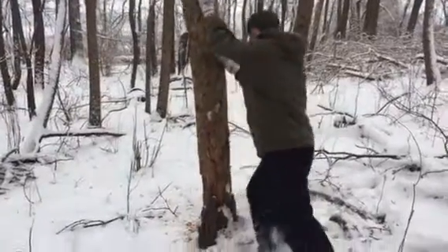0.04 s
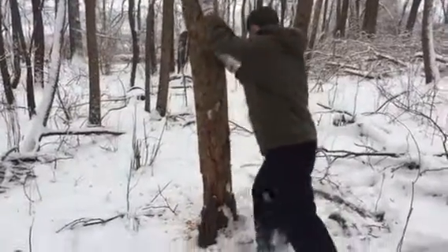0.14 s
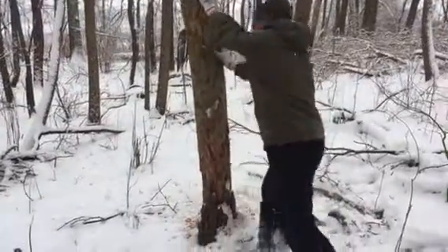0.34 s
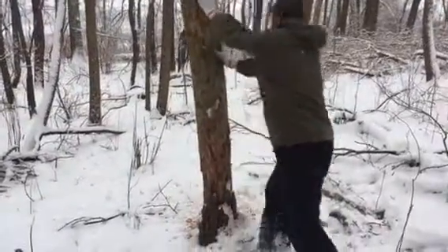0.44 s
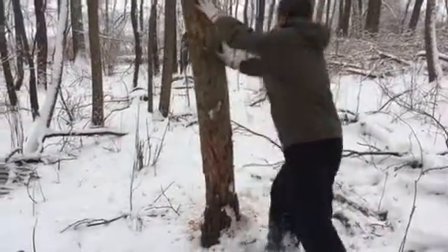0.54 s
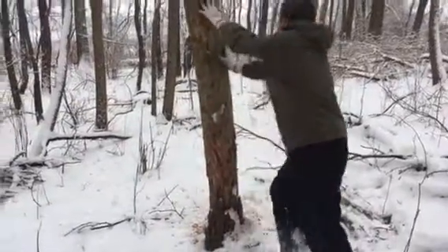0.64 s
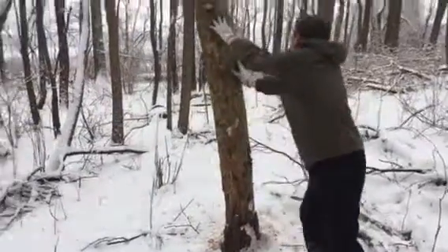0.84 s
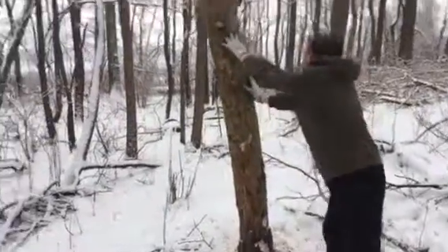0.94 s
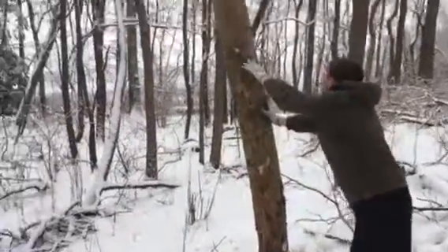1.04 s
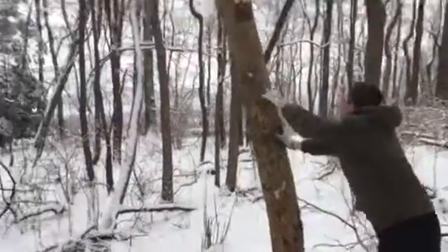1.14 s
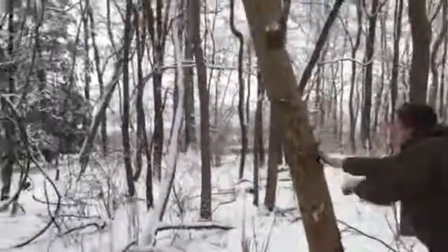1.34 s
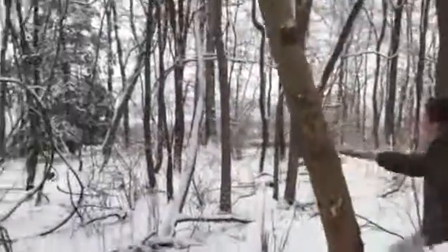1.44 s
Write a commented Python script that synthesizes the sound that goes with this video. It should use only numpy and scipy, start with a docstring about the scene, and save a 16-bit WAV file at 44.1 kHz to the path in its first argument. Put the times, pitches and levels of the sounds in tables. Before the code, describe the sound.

Wood cracks and splinters in sharp bursts as a dead tree is pushed over.

```python
"""Dead tree pushed over in the snow

A snowy forest in still air, heard in mono from near the trunk. The wood splits in bursts of sharp
cracks; the biggest jolt the trunk, which thumps. Small fibres crackle and sizzle as it leans, with
a rustle of clothes and soft thuds in the snow. The breaking wood echoes off the trees close by,
then washes back from the far ones."""
import sys
import numpy as np
from scipy import signal
from scipy.fft import rfft, irfft
from scipy.io import wavfile

SR = 44100
rng = np.random.default_rng(int(sys.argv[2]) if len(sys.argv) > 2 else 0)


def int16_out(signal):
    """Quantize to a 16-bit WAV file."""
    q = np.round(np.clip(np.atleast_2d(signal).T, -1, 1) * 32767)
    wavfile.write(sys.argv[1], SR, q.astype(np.int16))


N = 66150
TIME = np.arange(N) / SR

# still forest air: freq_hz, level_db
AIR_SPECTRUM = [(25, 2), (60, 7.5), (200, 1), (400, -10.5), (650, 0.5), (1500, -9), (4000, -25),
                (16000, -23)]
# clothes and boots shifting: time_s, level_db
RUSTLE_LEVELS = [(0, -64), (.88, -62), (.95, -45), (1.03, -52), (1.14, -44.5), (1.19, -55.5), (1.5, -53)]
# their dull tone: freq_hz, level_db
RUSTLE_SPECTRUM = [(25, -23), (60, -7), (130, 0.5), (300, 4), (450, -13), (700, -15), (2000, -34)]
# spurts of small fibres giving way: time_s, level_db
FIBRE_LEVELS = [(0, -58.5), (.219, -55), (.223, -17), (.256, -25.5), (.27, -32), (.34, -48), (.59, -50),
                (.665, -53.5), (.705, -22), (.72, -35.5), (.77, -50), (.89, -72), (.985, -63),
                (1.012, -39.5), (1.09, -44.5), (1.19, -48.5), (1.222, -46), (1.27, -45), (1.296, -35.5),
                (1.32, -48.5), (1.385, -47.5), (1.399, -35.5), (1.42, -52.5), (1.465, -42.5), (1.5, -47.5)]
# their woody tone: freq_hz, level_db
FIBRE_SPECTRUM = [(100, 6), (400, -2.5), (700, 4.5), (1500, 3.5), (3000, -1), (6000, -3), (10000, -9),
                  (16000, -16)]
# the finest fibres tearing: time_s, level_db
SIZZLE_LEVELS = [(0, -63.5), (.6, -59), (.8, -53.5), (.89, -56), (.99, -51.5), (1.012, -31), (1.06, -43.5),
                 (1.14, -44), (1.18, -46), (1.26, -43.5), (1.5, -55)]
# their bright tone: freq_hz, level_db
SIZZLE_SPECTRUM = [(1500, -19), (4000, -3.5), (9000, 2), (16000, -2)]
# dull knocks in the snow: start_s, level_db, pitch_hz, rise_s
SNOW_THUDS = [(0.09, -37.5, 680, 0.0024), (.092, -44, 208, 0.012), (.101, -40.5, 604, 0.0034),
              (0.223, -35, 41.8, 0.019), (0.694, -31.5, 120, 0.0061), (0.9051, -33.5, 156, 0.0049),
              (.997, -36.5, 116, 0.0069), (1.124, -37, 229, 0.0032), (1.147, -44.5, 105, 0.012),
              (1.221, -45, 230, 0.0034), (1.294, -49.5, 135, 0.021)]
# the wood splitting: start_s, ring_hz, ring_db, crack_hz, crack_db, snap_db, bark_db
WOOD_SPLITS = [(0.1986, 1500, -41, 3690, -48, -46, -53), (0.2206, 1460, -10.5, 2450, -14.5, -13.5, -21.5),
               (0.2268, 1130, -12.5, 2380, -13.5, -25, -16), (0.2299, 1110, -10.5, 5600, -17, -40, -18),
               (0.2423, 1470, -12, 2800, -17, -19, -32), (0.2497, 1500, -11.5, 2640, -13, -17, -29),
               (0.2764, 1220, -15.5, 2980, -14, -15, -21.5), (0.2928, 1500, -48, 2210, -33, -53, -50),
               (0.3691, 1940, -34, 2320, -39, -60, -52), (0.3834, 1440, -31, 5200, -37.5, -29, -46),
               (0.4476, 1360, -25.5, 3370, -23.5, -22, -35), (0.5864, 1500, -59, 4520, -47, -40, -63),
               (0.5957, 1430, -48, 3140, -34.5, -35, -59), (0.604, 1250, -18.5, 3025, -17, -9.5, -22.5),
               (0.618, 972, -35, 2410, -50, -29, -33), (0.6329, 1400, -15, 2830, -18, -21, -30),
               (0.6488, 1530, -31, 2850, -26, -30, -46), (0.6502, 1800, -23, 4330, -21, -25, -26.5),
               (0.673, 1470, -44, 3040, -38, -35, -52), (0.678, 1400, -32, 3000, -40, -40, -50),
               (0.6895, 1290, -16, 3240, -13.5, -23, -27.5), (0.6925, 1480, -18, 2730, -9.5, -17.5, -28),
               (0.6986, 1210, -17, 2400, -15.5, -18, -25), (0.7312, 1300, -35, 3700, -33, -35, -50),
               (0.7853, 1900, -58, 2230, -37.5, -34, -58), (0.8281, 1266, -34, 3420, -31.5, -31.5, -40),
               (0.8482, 1500, -62, 3330, -47, -40, -64.5), (0.9153, 1300, -19.5, 5460, -20.5, -26.5, -35.5),
               (0.9333, 1420, -59, 5920, -50, -35, -60), (0.9463, 1226, -27.5, 3600, -23.5, -21, -35),
               (0.9898, 1370, -23, 2860, -25, -19, -33), (0.9924, 1320, -18, 3110, -13, -16.5, -27.5),
               (1.0057, 1830, -25, 2400, -24.5, -23, -35), (1.054, 950, -49, 3500, -33, -29.5, -50),
               (1.0718, 1430, -33, 5870, -41, -26, -53), (1.0797, 933, -15.5, 6160, -25, -15.5, -19.5),
               (1.1028, 910, -41, 3490, -38, -34, -44), (1.1115, 1300, -48, 2650, -37, -36, -48),
               (1.132, 1380, -42, 3480, -34, -31, -40), (1.1499, 1250, -33.5, 3900, -36, -29.5, -42),
               (1.1976, 1580, -31.5, 2800, -25, -28.5, -41), (1.2176, 1470, -45, 5600, -45, -35, -52),
               (1.2211, 1570, -33, 5680, -35, -28, -40), (1.2254, 1500, -28.5, 3080, -28, -31, -45),
               (1.2345, 1400, -45, 3440, -44, -38, -52), (1.2445, 1420, -39, 3130, -31, -32, -41),
               (1.2565, 960, -37, 5850, -29, -27, -34.5), (1.2792, 1450, -36, 2960, -31, -35, -46),
               (1.2938, 1180, -27.5, 3660, -22, -16, -26), (1.3001, 1110, -32, 4300, -25, -38, -34),
               (1.3272, 1390, -36.5, 3500, -36, -39, -45), (1.3387, 1440, -36, 3400, -34, -42, -41.5),
               (1.3556, 1420, -43, 3500, -43, -35.5, -58), (1.398, 1010, -49, 4500, -37, -30, -42),
               (1.4325, 1290, -41, 2820, -34.5, -32, -51), (1.4595, 1400, -44, 3000, -33, -32.5, -51),
               (1.4623, 1450, -32, 2730, -29.5, -33.5, -39), (1.4713, 950, -45, 3380, -30.5, -36, -40)]
# jolts to the trunk: start_s, level_db, deep_mode_gain_db
TRUNK_JOLTS = [(0.2237, -18, -30), (0.2299, -11, -4.5), (0.2506, -21, 3), (0.291, -27, 9), (0.449, -40, -4),
               (0.606, -35.5, 1.5), (.6948, -22, -4.5), (0.701, -24, 3), (0.996, -33.5, -11)]
# modes of the trunk: pitch_hz, level_db, t60_s
TRUNK_MODES = [(61, -23, .15), (92.7, -12, 0.16), (120, -8.5, 0.1), (148.4, -13.5, 0.14), (186, -3, 0.072),
               (240, -5, 0.091), (282.6, -3.5, 0.1), (322.4, 1, 0.059), (336, -13, 0.055),
               (530, -9.5, 0.14), (573, -4.5, 0.039)]
# echoes among the trees: freq_hz, near_db, near_t60_s, far_db, far_t60_s
TREE_ECHOES = [(39.6, -31, 0.25, -9, 0.98), (117, -9, 0.26, -24.5, 0.79), (336, -11.5, 0.17, -26, 2.7),
               (630, -9, 0.31, -18, 2.74), (1300, -18, 0.28, -27, 1.5), (2010, -13.5, 0.27, -21.5, 1.7),
               (3180, -24.5, 0.082, -23, 0.94), (8000, -22.5, 0.14, -23.5, 0.28),
               (15900, -20, 0.21, -42, 0.26)]

SPLIT_RISE_S = 0.00035


def from_db(db):
    return 10 ** (np.asarray(db) / 20)


def unit_rms(x):
    return x / np.sqrt(np.mean(x ** 2) + 1e-20)


def unit_energy(x):
    return x / np.sqrt(np.sum(x ** 2) + 1e-20)


def level(curve):
    """Gain over time from points of time_s, level_db."""
    return from_db(np.interp(TIME, *np.transpose(curve)))


def band(x, low_hz, high_hz, order=2):
    sos = signal.butter(order, [low_hz, high_hz], "band", fs=SR, output="sos")
    return signal.sosfilt(sos, x + 1e-18)


def coloured(x, spectrum):
    """Shapes x by points of freq_hz, level_db; the result has rms 1."""
    hz, db = np.transpose(spectrum)
    bins_hz = np.maximum(np.fft.rfftfreq(N, 1 / SR), 1)
    gain = from_db(np.interp(np.log(bins_hz), np.log(hz), db)) * (bins_hz > 20)
    return unit_rms(irfft(rfft(x) * gain, N))


def add(out, start_s, x):
    i = int(start_s * SR)
    out[i:i + len(x)] += x[:N - i]


def air(level_db=-54.5):
    """The forest's faint, steady hush around the microphone."""
    return from_db(level_db) * coloured(rng.standard_normal(N), AIR_SPECTRUM)


def rustle():
    """Clothes and boots shift in the snow with a dull, swelling noise."""
    return level(RUSTLE_LEVELS) * coloured(rng.standard_normal(N), RUSTLE_SPECTRUM)


def crackle(per_s, spread_db, clumping_db, clump_s=0.0046, decay_s=0.00015, kinds=12, size=200):
    """Countless small snaps of uneven size come in clumps, each with one of several short rings."""
    wander = np.clip(rng.standard_normal(N), -2, 2)
    clump_db = clumping_db * np.interp(TIME / clump_s, np.arange(N), wander)
    clicks = (rng.random(N) < per_s / SR) * rng.choice([-1, 1], N)
    clicks = clicks * from_db(clump_db + spread_db * np.minimum(rng.exponential(1, N), 3.5))
    kind = rng.integers(0, kinds, N)
    rings = rng.standard_normal((kinds, size)) * np.exp(-TIME[:size] / decay_s)
    return sum(signal.fftconvolve(clicks * (kind == k), ring)[:N] for k, ring in enumerate(rings))


def fibres():
    """Small fibres give way one by one as the trunk leans, with a woody crackle."""
    snaps = crackle(per_s=3700, spread_db=3, clumping_db=4)
    return level(FIBRE_LEVELS) * coloured(snaps, FIBRE_SPECTRUM)


def sizzle():
    """The finest fibres tear so densely that their snaps merge into a bright sizzle."""
    snaps = crackle(per_s=12000, spread_db=7.5, clumping_db=3.5)
    return level(SIZZLE_LEVELS) * coloured(snaps, SIZZLE_SPECTRUM)


def thuds(grit_gain=0.52):
    """Roots, wood and boots knock in the snow, heavily damped: a few gritty cycles swell and fade."""
    out, t = np.zeros(N), TIME[:SR // 8]
    for start_s, db, hz, rise_s in SNOW_THUDS:
        grit = unit_rms(band(rng.standard_normal(len(t)), hz / 1.5, hz * 1.5))
        swell = (t / rise_s * np.exp(1 - t / rise_s)) ** 2
        add(out, start_s, from_db(db) * swell * (np.sin(2 * np.pi * hz * t) + grit_gain * grit))
    return out


def resonance(x, hz, width_hz):
    r = np.exp(-np.pi * width_hz / SR)
    return signal.lfilter([1, 0, -1], [1, -2 * r * np.cos(2 * np.pi * hz / SR), r * r], x)


def tear(t, decay_s, break_gain=5.04, break_s=0.0003, scatter_db=-27, scatter_s=0.0051):
    """One clean break in a brief rush of tiny ruptures, scattering weakly off bark and ground."""
    scatter = from_db(scatter_db) * np.exp(-t / scatter_s)
    envelope = (1 - np.exp(-t / SPLIT_RISE_S)) * (np.exp(-t / decay_s) + scatter)
    ruptures = envelope * rng.choice([-1, 1], len(t))
    ruptures[int(break_s * SR)] += break_gain
    return ruptures


def splits(bark_hz=680, bark_decay_s=0.0027):
    """Each split is the freed splinter's short ring, a pitched crack, a bright snap and a bark knock."""
    out, t = np.zeros(N), TIME[:2000]
    bark = np.sin(2 * np.pi * bark_hz * t) * np.exp(-t / bark_decay_s) * (1 - np.exp(-t / SPLIT_RISE_S))
    for start_s, ring_hz, ring_db, crack_hz, crack_db, snap_db, bark_db in WOOD_SPLITS:
        ring = resonance(tear(t, decay_s=0.0027), ring_hz, width_hz=550)
        ring = band(ring, max(380, 0.5 * ring_hz), min(3100, 2.03 * ring_hz), order=3)
        crack = resonance(tear(t, decay_s=0.0016), crack_hz, width_hz=1010)
        crack = band(crack, 1400, 8800)
        snap = band(tear(t, decay_s=0.00063, break_gain=1.46), 4180, 14300)
        for part, db in (ring, ring_db), (crack, crack_db), (snap, snap_db), (bark, bark_db):
            add(out, start_s, from_db(db) * unit_energy(part))
    return out * np.sqrt(0.002 * SR)   # each part carries the energy of 2 ms at its level


def trunk(deep_below_hz=210, rise_s=0.001):
    """A big split lets the trunk drop a little and sets its modes ringing."""
    out, t = np.zeros(N), TIME[:SR // 2]
    for start_s, db, deep_db in TRUNK_JOLTS:
        thump = np.zeros(len(t))
        for hz, mode_db, t60_s in TRUNK_MODES:
            struck_db = db + mode_db + deep_db * (hz < deep_below_hz) + rng.normal(0, 1)
            thump += from_db(struck_db - 60 * t / t60_s) * np.sin(2 * np.pi * hz * t)
        add(out, start_s, thump * (1 - np.exp(-t / rise_s)))
    return out


def echo_envelope(db, t60_s, onset_s):
    """Reflections build up, then die away."""
    return from_db(db) * unit_energy((1 - np.exp(-TIME / onset_s)) * from_db(-60 * TIME / t60_s))


def forest(x):
    """Nearby trunks and ground answer at once; far trees return a long, duller wash."""
    hz, *columns = np.transpose(TREE_ECHOES)
    edges_hz = np.geomspace(25, 18000, 15)
    response = np.zeros(N)
    for low, high in zip(edges_hz, edges_hz[1:]):
        log_centre = np.log(low * high) / 2
        near_db, near_t60_s, far_db, far_t60_s = (np.interp(log_centre, np.log(hz), c) for c in columns)
        near = echo_envelope(near_db, near_t60_s, onset_s=0.0036)
        far = echo_envelope(far_db, far_t60_s, onset_s=0.034)
        response += band(rng.standard_normal(N) * np.hypot(near, far), low, high)
    return signal.fftconvolve(x, response)[:N]


def scene():
    """At the foot of the tree: breaking wood and its echoes, over thuds, rustle and still air."""
    wood = fibres() + splits() + trunk()
    return (air() + rustle() + sizzle() + thuds() + wood + forest(wood))[None]


def record(dry, low_cut_hz=51, ceiling=0.66, high_cut_hz=16700):
    """Microphone and recorder lose the deepest bass, round the loudest peaks and cut the top."""
    thinned = signal.sosfilt(signal.butter(2, low_cut_hz, "high", fs=SR, output="sos"), dry)
    rounded = ceiling * np.tanh(thinned / ceiling)
    return signal.sosfilt(signal.cheby2(16, 60, high_cut_hz, fs=SR, output="sos"), rounded)


dry = scene()
out = record(dry)
int16_out(out)
```